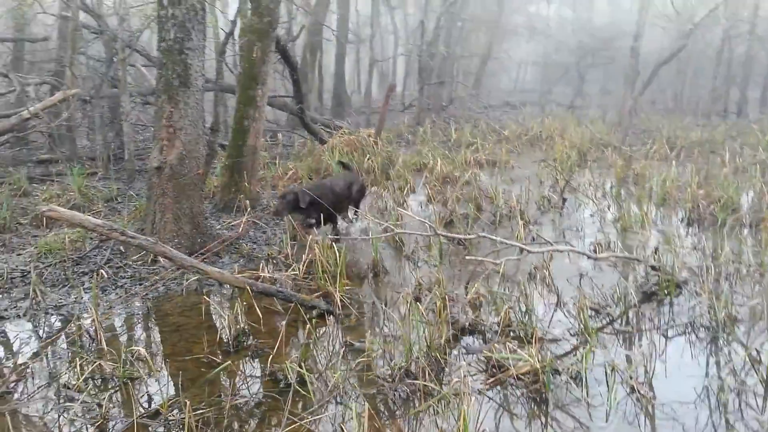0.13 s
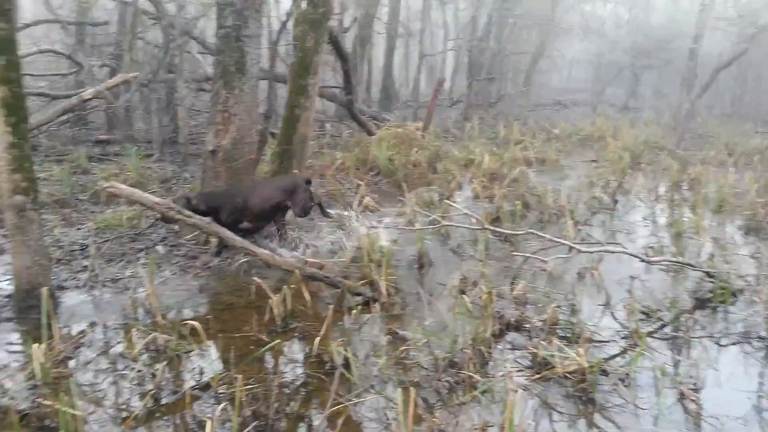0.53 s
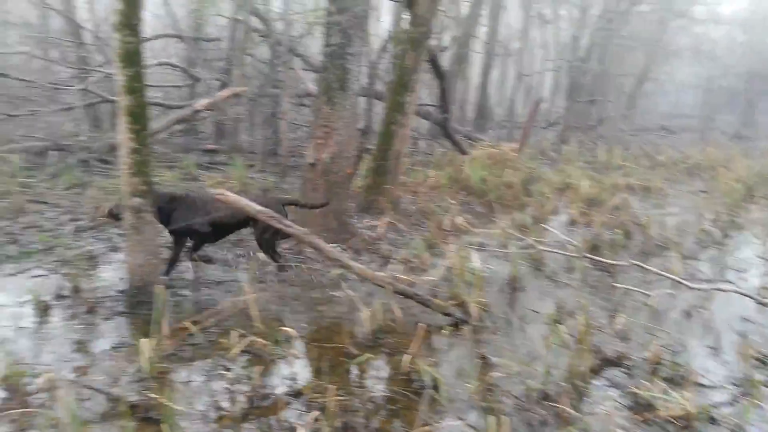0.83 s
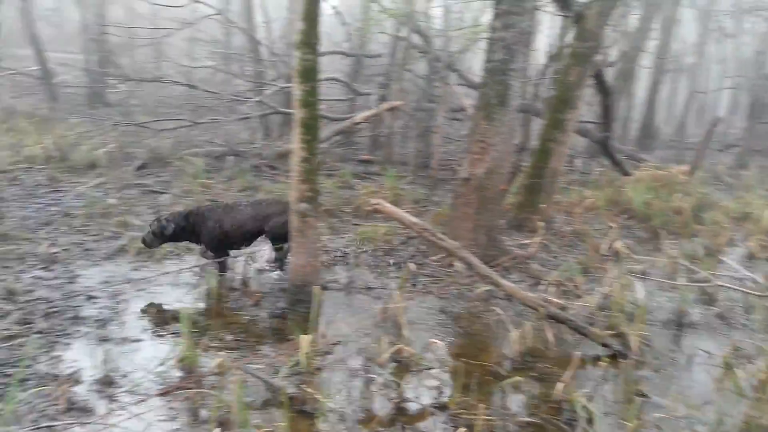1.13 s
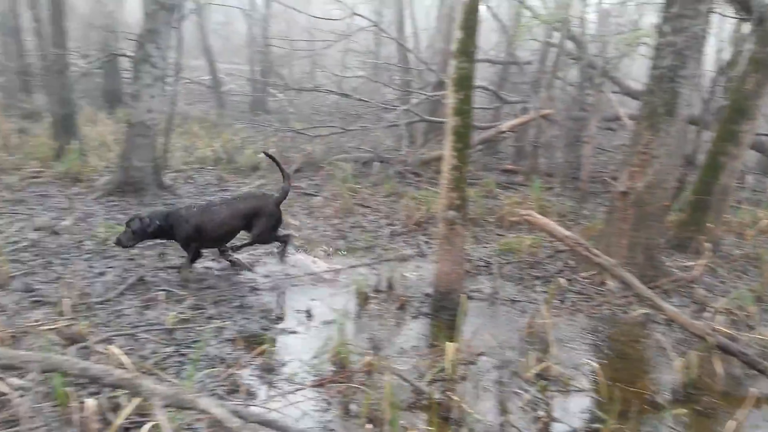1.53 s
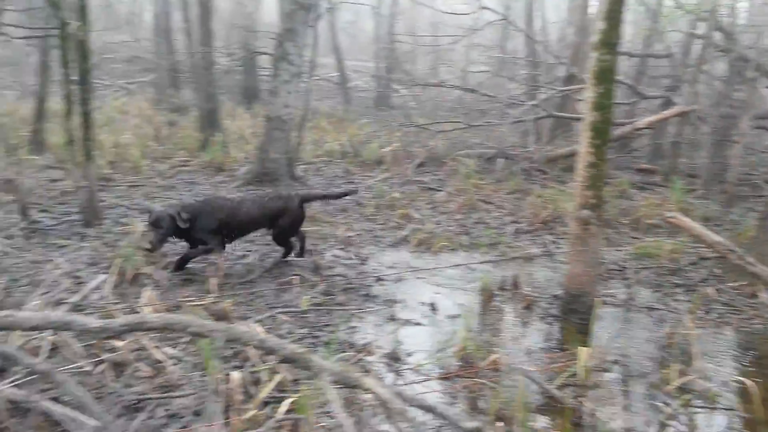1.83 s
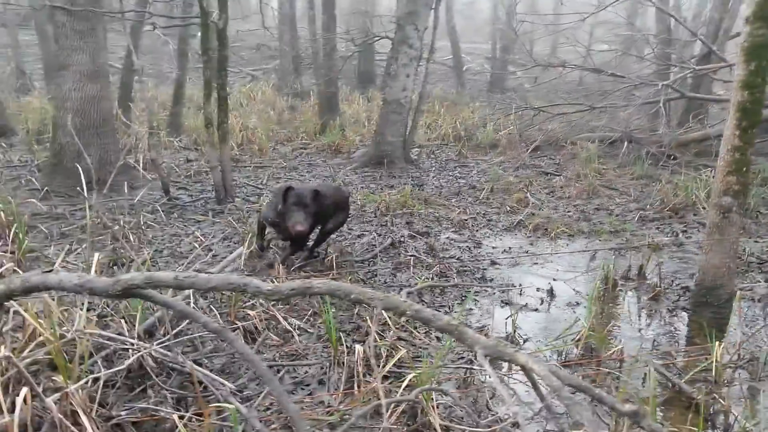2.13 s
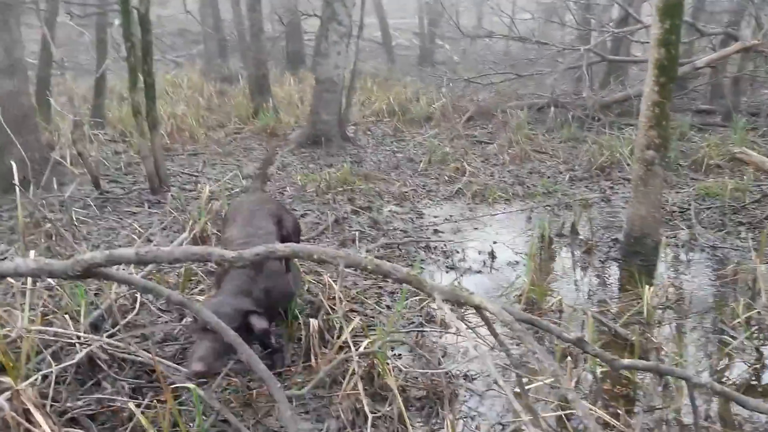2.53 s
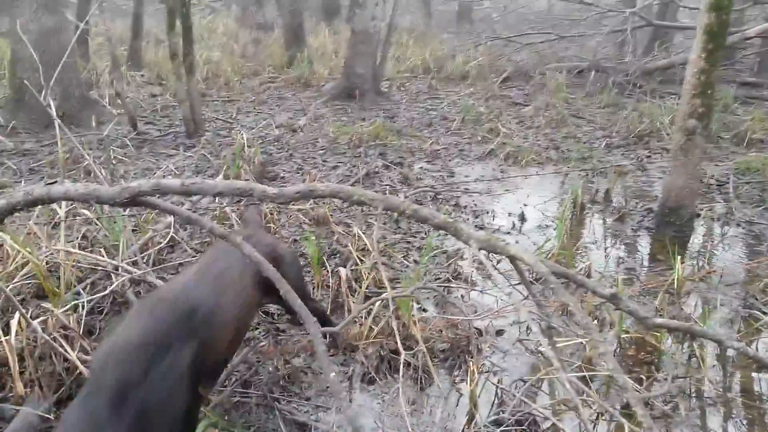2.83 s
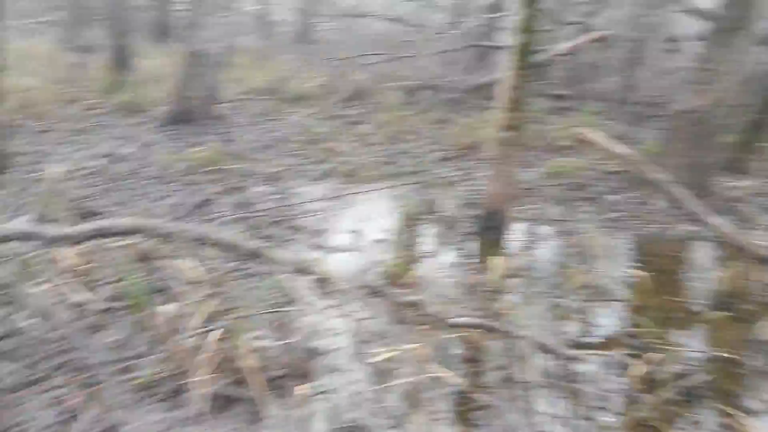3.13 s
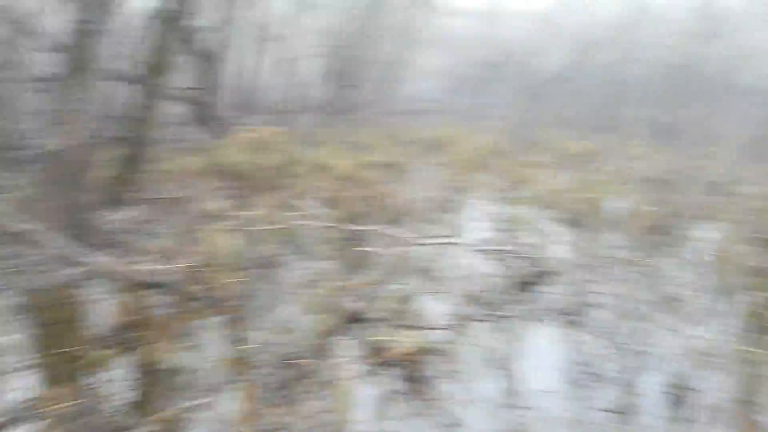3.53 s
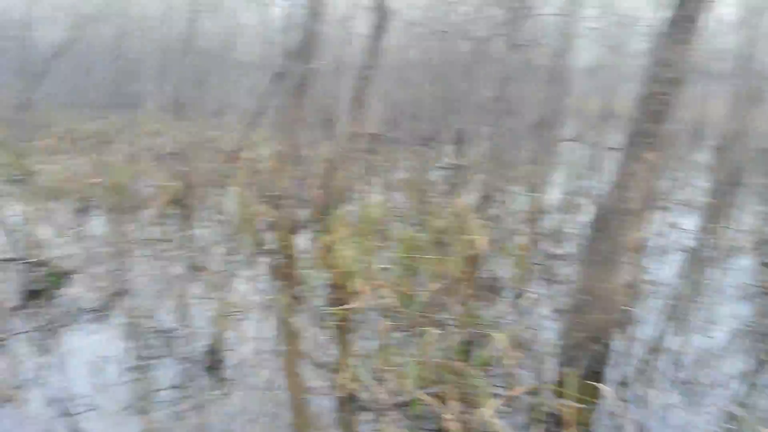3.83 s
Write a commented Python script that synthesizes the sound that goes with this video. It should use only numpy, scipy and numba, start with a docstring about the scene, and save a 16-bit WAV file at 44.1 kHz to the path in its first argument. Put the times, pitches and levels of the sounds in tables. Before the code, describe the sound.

Quick splashes of a running dog's paws cross a flooded woodland, mixed with small twig snaps. After a quieter moment, stalks snap and rustle close to the microphone, and deeper sloshing follows as the dog passes, over a faint distant rumble.

```python
"""A dog runs through a shallow woodland swamp, turns, crashes through wet stalks right past the
stereo microphone and wades on behind it. Each paw slaps the water, may trap a ringing pocket of
air, and throws up spray and bubbles; drops patter back, stalks snap and scrape along its coat.
Reeds and trunks scatter the sound, and a faint rumble lies in the distance."""
import sys
import numpy as np
from scipy import signal
from scipy.fft import rfft, irfft
from scipy.io import wavfile
from scipy.ndimage import map_coordinates
from numba import njit

SR = 44100
rng = np.random.default_rng(int(sys.argv[2]) if len(sys.argv) > 2 else 0)


def store_wav(level_fs):
    """Save 16-bit WAV to argv[1]."""
    pcm = np.round(np.clip(np.atleast_2d(level_fs), -1, 1) * 32767)
    wavfile.write(sys.argv[1], SR, pcm.T.astype(np.int16))


N = 176400

# Levels are relative, ahead of the microphone's colour.
# paws slapping the water: start_s, smack_db, thud_db, decay_s
PAW_SLAPS = [(0.0517, -14.5, -23.5, 0.0024), (0.1417, -26, -22.5, 0.0037), (0.292, -19, -26, 0.0024),
             (0.305, -23, -23, 0.0038), (0.3996, -20, -45, 0.0019), (0.6317, -15.5, -31, 0.0033),
             (1.08, -27.5, -23.5, 0.0037), (1.352, -18, -17.5, 0.0011), (1.573, -26.5, -25, 0.0023),
             (1.586, -28, -38, 0.0022), (1.6043, -21.5, -44.5, 0.003), (1.641, -19, -20, 0.0019),
             (2.531, -33, -34, 0.0045), (2.587, -33, -49, 0.0012), (2.815, -27, -25, 0.0027),
             (2.8929, -11, -22.5, 0.0034), (3.077, -40, -37, 0.0027), (3.277, -14, -36, 0.0027),
             (3.296, -15, -31, 0.0039), (3.329, -17.5, -41, 0.0027), (3.671, -38, -29, 0.0055)]
# water thrown up by a stride: start_s, rise_s, decay_s, spray_db, fizz_db, gurgle_db
STRIDE_SPLASHES = [ (0.063, 0.0034, 0.037, -34.5, -36, -56), (0.132, 0.0054, 0.07, -34.5, -38, -49),
                   (0.297, 0.0059, 0.035, -29.5, -28.5, -40), (0.397, 0.0025, 0.044, -34, -36.5, -61),
                   (0.524, 0.016, 0.011, -54, -37, -64), (0.614, 0.017, 0.026, -29.5, -68, -48),
                   (0.848, 0.053, 0.021, -35, -69, -65), (.908, .012, 0.01, -34.5, -44.5, -53),
                   (1.118, 0.0067, 0.065, -33.5, -45, -70), (1.215, 0.014, 0.038, -61, -45, -47),
                   (1.324, 0.028, 0.083, -34.5, -42.5, -50), (1.371, 0.038, 0.033, -42, -37, -54),
                   (1.540, 0.04, 0.023, -32.5, -33.5, -46.5), (1.708, 0.024, 0.076, -39.5, -46, -70),
                   (1.957, 0.059, 0.03, -42.5, -47.5, -48.5), (2.130, 0.021, 0.062, -49, -51, -55),
                   (2.200, 0.018, 0.012, -41.5, -50, -56), (2.290, .006, 0.027, -50, -63, -50.5),
                   (2.372, 0.034, 0.027, -35.5, -57, -47.5), (2.524, 0.0095, 0.021, -29.5, -38, -39),
                   (2.584, 0.0052, 0.023, -37, -40.5, -51), (2.660, .020, 0.25, -40, -47.5, -54),
                   (2.730, 0.053, 0.047, -38.5, -60, -49), (2.805, 0.04, 0.018, -35.5, -60, -39),
                   (2.903, 0.024, 0.03, -26.5, -47, -55), (3.061, 0.013, 0.13, -29, -34, -42),
                   (3.138, 0.023, 0.024, -26.5, -30, -51), (3.232, 0.023, .030, -38, -59, -50),
                   (3.283, 0.048, 0.038, -26.5, -36, -34), (3.367, 0.0083, 0.09, -39.5, -35.5, -34.5),
                   (3.446, 0.05, 0.053, -27.5, -31, -36), (3.51, 0.03, 0.076, -44, -33.5, -36.5),
                   (3.660, 0.012, 0.032, -37.5, -33, -33.5), (3.728, 0.0082, 0.09, -52, -37, -39.5),
                   (3.793, 0.029, 0.091, -36.5, -49, -31.5), (3.867, 0.0046, 0.045, -33, -52, -36),
                   (3.914, 0.04, 0.017, -38.5, -41.5, -30.5)]
# air pockets ringing as the water closes: start_s, pitch_hz, level_db, decay_cycles
AIR_POCKETS = [(.0545, 519, -16.5, 2.3), (.137, 1320, -17, 1.4), (.143, 670, -18.5, 2.6),
               (0.2924, 910, -13, 2.9), (.402, 2250, -20, 1.5), (.562, 823, -30, 4), (.724, 686, -31, 1.4),
               (.878, 1800, -28.5, 3.5), (1.084, 1700, -27.5, 5.6), (1.100, 2390, -22.5, 3.6),
               (1.151, 1500, -21, 2.6), (1.204, 4500, -30.5, 5.2), (1.354, 1000, -27, 0.88),
               (1.402, 580, -27, 1.6), (1.470, 1460, -28.5, 6.8), (1.571, 1450, -21.5, 2.7),
               (1.579, 1360, -20, 1.6), (1.609, 1530, -24, 3.4), (1.6428, 1010, -16, 2.3),
               (1.891, 4130, -37, 8.1), (1.932, 4740, -36, 6.2), (2.543, 1650, -13.5, 1.3),
               (2.895, 505, -7.5, 1.11), (2.921, 1740, -13.5, 1.6), (3.079, 1090, -15, 4.1),
               (3.099, 1810, -22, 3), (3.166, 450, -21, 2.3), (3.190, 355, -24, 2.9),
               (3.247, 304, -27.5, 3), (3.306, 630, -8.5, 2.8), (3.328, 610, -15, 1.3),
               (3.352, 380, -9, 0.81), (3.378, 570, -20.5, 3.9), (3.393, 650, -16, 1.1),
               (3.469, 510, -18, 6.2), (3.483, 895, -12.5, 1.4), (3.572, 970, -17.5, 1.4),
               (3.610, 367, -29, 3.8), (3.672, 364, -26, 3.5), (3.806, 308, -24, 6.2),
               (3.827, 385, -27, 4.2), (3.852, 415, -12.5, 1.16), (3.935, 361, -26, 3.7),
               (3.953, 250, -27, 1.7)]
# stalks and twigs snapping: start_s, level_db, decay_s, brightness_db
STALK_SNAPS = [(0.0672, -11, .0009, -25), (0.288, -23.5, 0.0026, 5.5), (0.4006, -26, 0.0029, 8.5),
               (.418, -26, .0012, 5), (0.5533, -28, 0.00084, 10), (.601, -22.5, .00055, 1),
               (0.86, -21.5, 0.0018, -5), (0.8925, -21, 0.0017, 1), (1.1162, -20, .0005, 7),
               (1.1183, -7, 0.00041, -4), (1.255, -28, 0.00095, 10), (1.349, -27, 0.0012, 12.5),
               (1.3967, -21.5, 0.0013, 0), (1.4007, -27, 0.0014, 8), (1.559, -25, 0.00049, 5),
               (1.711, -36, 0.0019, -3), (1.8134, -21, 0.001, -13), (1.962, -31, 0.0018, 2),
               (2.002, -37, 0.00092, 0), (2.021, -30.5, 0.0031, -1), (2.295, -35, 0.00093, 10),
               (2.3873, -28, 0.00077, 4), (2.413, -30, 0.0006, -2), (2.421, -37, 0.00062, -2),
               (2.455, -19, 0.00074, -10), (2.468, -27.5, 0.00087, 4), (2.479, -15.5, 0.001, -5.5),
               (2.665, -30, .00078, -2), (2.68, -28, 0.0011, 2), (2.711, -18, 0.00039, -3),
               (2.742, -17.5, 0.0014, -9), (2.7533, -17, 0.0012, 6), (2.771, -25, 0.00073, -3),
               (2.8095, -20, .0007, -3), (2.842, -13, 0.0014, -10), (3.132, -12, .0018, -1.5),
               (3.4867, -18, 0.0021, -10), (3.969, -32, .001, 18)]
# the dog's body brushing through stalks: start_s, rise_s, decay_s, level_db
COAT_BRUSHES = [(.575, .02, 0.014, -36), (.69, .02, 0.21, -43.5), (.885, 0.009, 0.073, -39),
                (1.708, 0.025, .025, -36.5), (2.102, 0.02, 0.11, -46.5), (2.29, 0.0036, 0.031, -41),
                (2.375, 0.0037, 0.018, -46), (2.659, 0.0044, 0.12, -34.5), (2.754, 0.0028, 0.038, -32),
                (2.81, 0.0037, 0.066, -33), (3.072, 0.01, 0.031, -22.5), (3.275, .02, 0.025, -34)]
# contour of the drops pattering back: time_s, level_db
PATTER_CONTOUR = [(0.0, -35.5), (0.07, -40), (0.77, -38), (0.91, -43), (1.05, -48), (1.28, -43.5),
                  (1.52, -40.5), (1.68, -46.5), (1.79, -42), (2.0, -47), (2.08, -52.5), (2.17, -47),
                  (2.27, -53), (2.37, -48), (2.46, -44), (2.64, -47), (2.91, -37), (3.27, -33.5),
                  (3.39, -35), (3.54, -43), (3.65, -44.5), (3.85, -37.5), (4.0, -36)]
# top octave, mostly lost once the dog is behind the microphone: time_s, gain_db
REAR_SHADOW = [(2.3, -0.5), (2.75, -3.5), (3.2, 1), (3.5, -5), (3.9, -12)]

# colour of each source: frequency_hz, gain_db
RUMBLE_COLOUR = [(20, -11), (40, -16.5), (68, 1), (110, -4.5), (155, -1.5), (210, -11), (400, -17.5),
                 (1000, -30.5), (4000, -40), (16000, -38.5)]
DROP_COLOUR = [(100, -0.5), (400, -1.5), (1000, 0), (2000, 1.5), (3500, -4.5), (7000, 2.5), (11000, -0.5),
               (16000, -23.5)]
SMACK_COLOUR = [(100, -6.5), (500, 10), (1500, -1.5), (3500, 6.5), (7000, 11), (16000, -7.5)]
THUD_COLOUR = [(60, -4), (200, -7), (450, -16.5), (1200, -11), (2500, -13.5), (8000, -53)]
SPRAY_COLOUR = [(100, -9), (400, -15), (1000, 2.5), (2000, 4.5), (3500, -3), (7000, 3.5), (11000, 1),
                (16000, -23)]
CRACK_COLOUR = [(200, -14), (1000, 5.5), (3000, 3.5), (6000, 12.5), (12000, 7), (16000, -8)]
RUSTLE_COLOUR = [(300, -30), (1500, -14), (4000, -5.5), (7000, 10.5), (11000, 8), (16000, -7)]
REED_COLOUR = [(400, -7.5), (1200, 9.5), (3000, 2.5)]
# the two microphone ports ring at different pitches: frequency_hz, gain_db
LEFT_RESPONSE = [(60, -4), (700, -1.5), (2000, 0.5), (3800, 8), (4700, 13.5), (5350, 13.5), (6100, 4.5),
                 (7200, -2.5), (11000, 1.5), (14500, 16), (15400, 4)]
RIGHT_RESPONSE = [(60, -2.5), (700, 2), (2000, 1.5), (3600, 4.5), (5000, -1), (6000, 0.5), (8000, -2),
                  (10500, 5), (12200, 18.5), (13100, 19), (14200, 12), (15400, 21.5)]

PORT_LAG_S, TOP_HZ = 0.00008, 15600  # left port's delay; top of the microphone's range
DROP_LAG_SPREAD_S, DROP_PAN_DB = 0.00005, 5.5
BUBBLE_LAG_SPREAD_S, BUBBLE_PAN_DB = 0.000099, 3.5
REEDS_DB, REEDS_T60_S = -11.5, 0.08
TRUNKS_DB, TRUNKS_T60_S = -11, 0.32
CLUMP_HZ, CLUMP_DB = 130.3, 2
LOW_CUT_HZ = 95  # small splashes carry no deep bass
BRIGHT_HZ = 8050  # thin stalks crack mostly above this, thick ones below
SHADOW_HZ = 8160


def undb(db):
    return 10 ** (np.asarray(db) / 20)


def unit(x):
    return x / np.sqrt(np.mean(x ** 2))


def colour(x, points):
    """Minimum-phase filter through (Hz, dB) points."""
    size = 2 * N
    hz, db = np.array(points).T
    bin_hz = np.arange(N + 1) * SR / size
    gain = undb(np.interp(np.log(bin_hz + 1), np.log(hz), db))
    cepstrum = irfft(np.log(gain))
    cepstrum[1:N] *= 2
    cepstrum[N + 1:] = 0
    return irfft(rfft(x, size) * np.exp(rfft(cepstrum)))[..., :N]


def tint(x, points):
    """Colour that keeps the power of white noise."""
    hz, db = np.array(points).T
    gain = undb(np.interp(np.log(np.linspace(1, TOP_HZ, N)), np.log(hz), db))
    return colour(x, points) / np.sqrt(np.mean(gain ** 2))


def add(out, start, sound):
    """Mix a sound in at start seconds."""
    i = max(int(start * SR), 0)
    out[..., i:i + sound.shape[-1]] += sound[..., :max(N - i, 0)]


def curve(rows):
    """Straight lines through (time, value) points."""
    return np.interp(np.arange(N) / SR, *np.array(rows).T)


def swell(start, rise, decay):
    """A straight rise and an exponential fall."""
    t = np.arange(N) / SR - start
    return np.clip(t / rise, 0, 1) * np.exp(-np.maximum(t - rise, 0) / decay)


def burst(decay):
    """A short crack of noise with a fast rise."""
    t = np.arange(int(8 * decay * SR)) / SR
    shape = (1 - np.exp(-1.5 * t / decay)) ** 2 * np.exp(-t / decay)
    noise = rng.standard_normal(N // 10)[:len(t)]
    return 3.42 * shape * np.tanh(0.92 * noise)


def clumps():
    """Water and stalks come in lumps: a fast random gain."""
    knots = np.clip(rng.standard_normal(N // 40), -2, 2)
    flutter = np.interp(np.arange(N) / SR * CLUMP_HZ, np.arange(len(knots)), knots)
    return unit(undb(CLUMP_DB * flutter))


def ports(x):
    """The sound reaches the microphone's left port a little late."""
    return np.array([map_coordinates(x, [np.arange(N) - PORT_LAG_S * SR]), x])


def impacts(count, spread_db):
    """Tiny clicks of uneven size, each reaching the microphone from its own direction."""
    when, sign = rng.random((count, 2)).T
    size, lag, pan = np.clip(rng.standard_normal((count, 3)).T, -2.5, 2.5)
    out = np.zeros((2, N))
    for channel, side in enumerate((1, -1)):
        arrival = when * N + side * (PORT_LAG_S + DROP_LAG_SPREAD_S * lag) * SR / 2
        gain = np.sign(sign - .5) * undb(spread_db * size + side * DROP_PAN_DB * pan / 2)
        for tap in range(-3, 5):  # a sinc places each click between samples
            i = np.floor(arrival).astype(int) + tap
            out[channel] += np.bincount(i % N, gain * np.sinc(i - arrival), N)
    return unit(out)


@njit
def ring(starts, hz, cycles, gains, glide):
    """Bubbles ring as damped sines that rise in pitch as they fade."""
    out = np.zeros(N)
    for k in range(len(starts)):
        life = cycles[k] / hz[k]
        first = int(starts[k] * SR) + 1
        for i in range(max(first, 0), min(first + int(6 * life * SR), N)):
            t = i / SR - starts[k]
            envelope = (1 - np.exp(-3 * t * hz[k])) * np.exp(-t / life)
            phase = 2 * np.pi * hz[k] * t * (1 + glide * t / life)
            out[i] += gains[k] * envelope * np.sin(phase)
    return out


def bubbles(count, low_hz, high_hz, cycles, spread_db, glide):
    """A steady stream of bubbles of mixed sizes, spread across the stereo image."""
    when, pitch, life, size = rng.random((count, 4)).T
    lag, pan = rng.standard_normal((count, 2)).T
    hz = low_hz * (high_hz / low_hz) ** pitch
    starts = (np.arange(count) + when) / count * N / SR
    channels = []
    for side in (.5, -.5):
        arrivals = starts + side * (PORT_LAG_S + BUBBLE_LAG_SPREAD_S * lag)
        gains = undb(spread_db * size ** 2 + side * BUBBLE_PAN_DB * pan)
        channels.append(ring(arrivals, hz, cycles * (.5 + life), gains, glide))
    return unit(np.array(channels))


def distant_rumble():
    """Far-off low noise, nearly the same at both ports."""
    mid, side = rng.standard_normal((2, N))
    noise = mid + 0.27 * side * np.array([[1], [-1]])
    return undb(-45.5) * unit(colour(noise, RUMBLE_COLOUR))


def drop_patter():
    """Drops fall back on water and leaves, with a tinkle of tiny ringing bubbles."""
    ticks = tint(impacts(count=9000, spread_db=2), DROP_COLOUR)
    tinkle = bubbles(count=1500, low_hz=2430, high_hz=7310, cycles=22, spread_db=18, glide=0.0051)
    return undb(curve(PATTER_CONTOUR) - 2.5) * (ticks + undb(-11.5) * tinkle)


def paw_slaps():
    """A bright smack and a dull thud as a paw lands in the shallows."""
    smack, thud = np.zeros((2, N))
    for start, smack_db, thud_db, decay in PAW_SLAPS:
        add(smack, start, undb(smack_db) * burst(decay))
        add(thud, start, undb(thud_db) * burst(decay))
    return ports(tint(smack, SMACK_COLOUR) + tint(thud, THUD_COLOUR))


def echoes(x, t60):
    """Diffuse echoes off reeds or trunks, different at each port."""
    t = np.arange(SR) / SR
    tail = rng.standard_normal((2, SR)) * undb(-60 * t / t60)
    tail /= np.sqrt(np.sum(tail ** 2) / 2)
    return signal.fftconvolve(x, tail, axes=1)[:, :N]


def air_plops():
    """Single pockets of trapped air ring out as the water closes."""
    start, hz, db, cycles = np.array(AIR_POCKETS).T.copy()
    return ports(ring(start, hz, cycles, undb(db), glide=0.026))


def splashes():
    """Each stride throws up spray, a fizz of small bubbles and a deep gurgle."""
    power = sum((undb(levels_db)[:, None] * swell(start, rise, decay)) ** 2
                for start, rise, decay, *levels_db in STRIDE_SPLASHES)
    spray_gain, fizz_gain, gurgle_gain = np.sqrt(power)
    drops = tint(impacts(count=11000, spread_db=1), SPRAY_COLOUR)
    beads = bubbles(count=4000, low_hz=2136, high_hz=7200, cycles=1.84, spread_db=0.5, glide=0.022)
    spray = clumps() * (drops + undb(-8.5) * beads)
    fizz = bubbles(count=2600, low_hz=665, high_hz=2200, cycles=1.04, spread_db=10.5, glide=0.021)
    gurgle = bubbles(count=1600, low_hz=195.3, high_hz=778, cycles=3.43, spread_db=8, glide=0.061)
    return spray_gain * spray + fizz_gain * fizz + gurgle_gain * gurgle


def stalk_snaps():
    """Brittle stalks snap under the dog, each with its own brightness."""
    out = np.zeros(N)
    for start, db, decay, bright_db in STALK_SNAPS:
        crack = undb(db) * burst(decay)
        body = signal.sosfiltfilt(signal.butter(2, BRIGHT_HZ, fs=SR, output="sos"), crack)
        add(out, start, body + undb(bright_db) * (crack - body))
    return ports(tint(out, CRACK_COLOUR))


def coat_rustle():
    """Stalks scrape along the dog's coat in a bright crackle."""
    force = sum(undb(db) * swell(start, rise, decay) for start, rise, decay, db in COAT_BRUSHES)
    crackle = impacts(count=7000, spread_db=5)
    return force * clumps() * tint(crackle, RUSTLE_COLOUR)


def rear_shadow(dog):
    """The top octave falls away unevenly as the dog passes behind the microphone."""
    low = signal.sosfiltfilt(signal.butter(2, SHADOW_HZ, fs=SR, output="sos"), dog)
    return low + undb(curve(REAR_SHADOW)) * (dog - low)


def scene():
    """The swamp from the microphone's spot: dog close by, trunks around, rumble far off."""
    hits = paw_slaps() + stalk_snaps()
    reeds = undb(REEDS_DB) * colour(echoes(hits, REEDS_T60_S), REED_COLOUR)
    dog = hits + reeds + air_plops() + splashes() + coat_rustle() + drop_patter()
    dog = signal.sosfilt(signal.butter(2, LOW_CUT_HZ, "high", fs=SR, output="sos"), dog)
    dog = rear_shadow(dog)
    trunks = undb(TRUNKS_DB) * echoes(dog, TRUNKS_T60_S)
    return dog + trunks + distant_rumble()


def record(dry):
    """Each microphone port adds its own resonance; the top is cut steeply."""
    heard = np.array([colour(dry[0], LEFT_RESPONSE), colour(dry[1], RIGHT_RESPONSE)])
    top_cut = signal.ellip(8, .2, 70, TOP_HZ, fs=SR, output="sos")
    return signal.sosfilt(top_cut, undb(-1.5) * heard)


dry = scene()
out = record(dry)
store_wav(out)
```